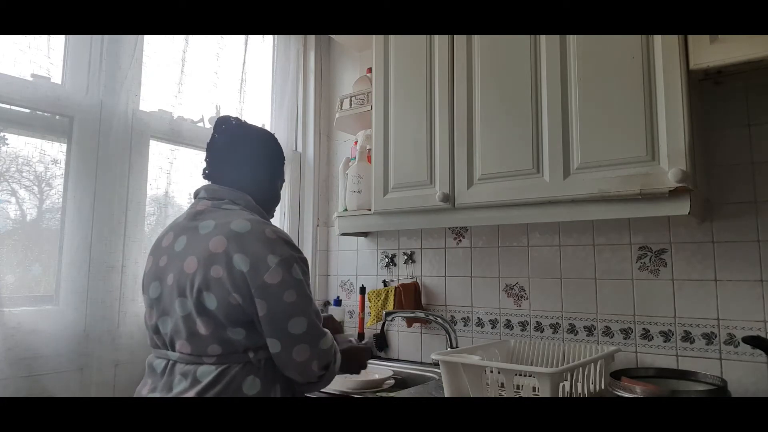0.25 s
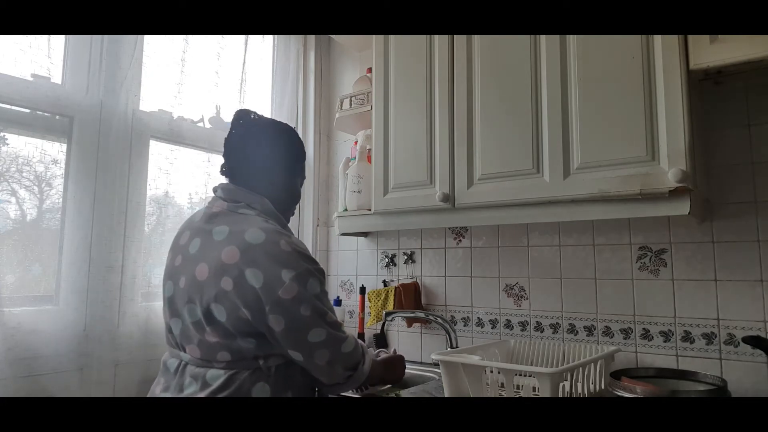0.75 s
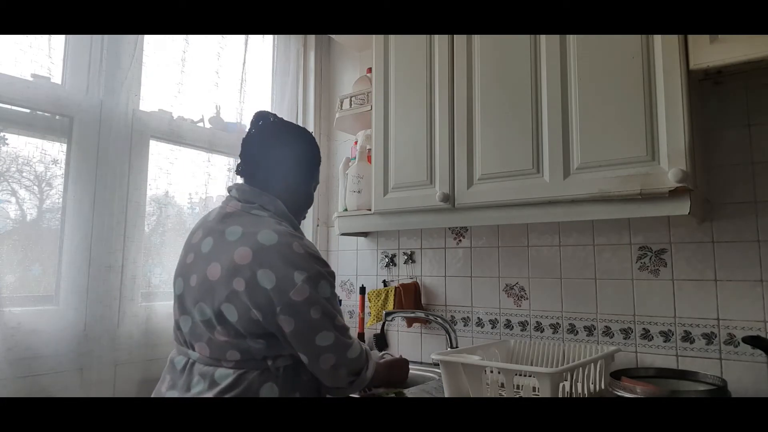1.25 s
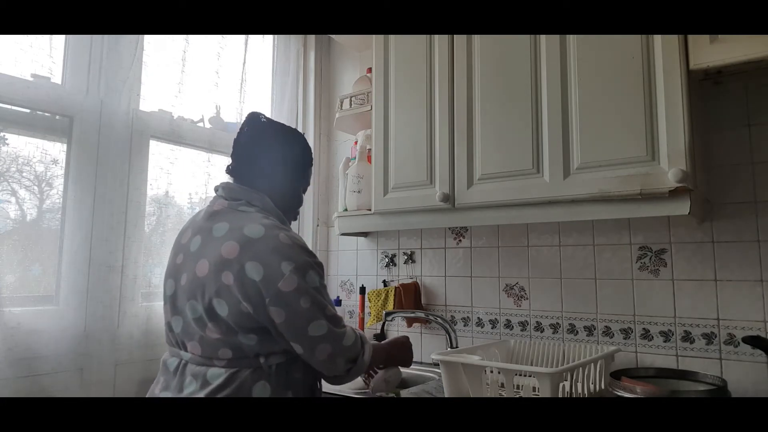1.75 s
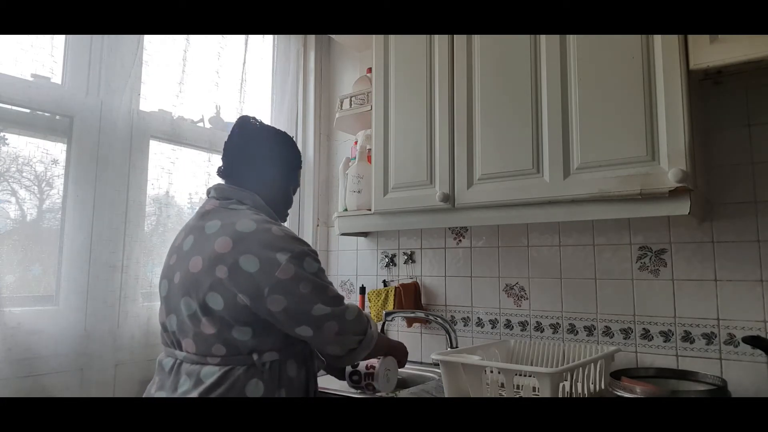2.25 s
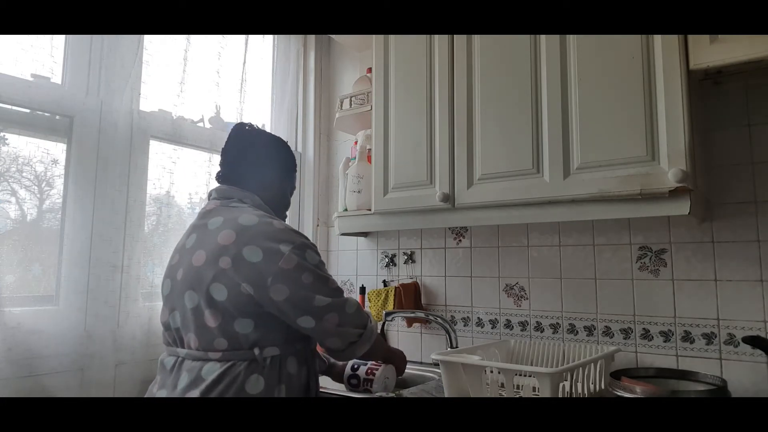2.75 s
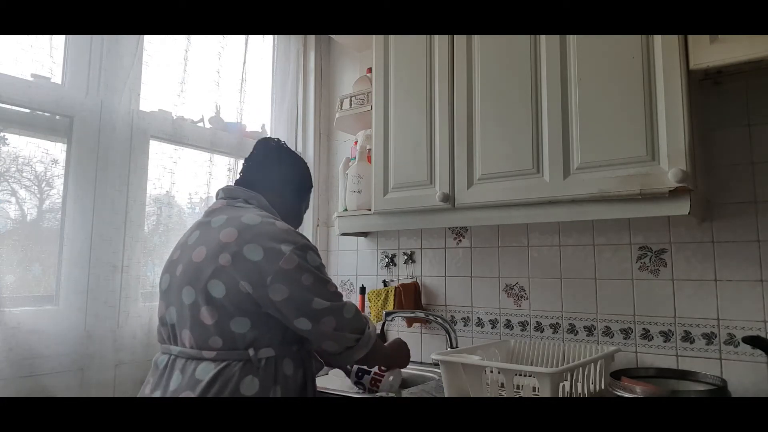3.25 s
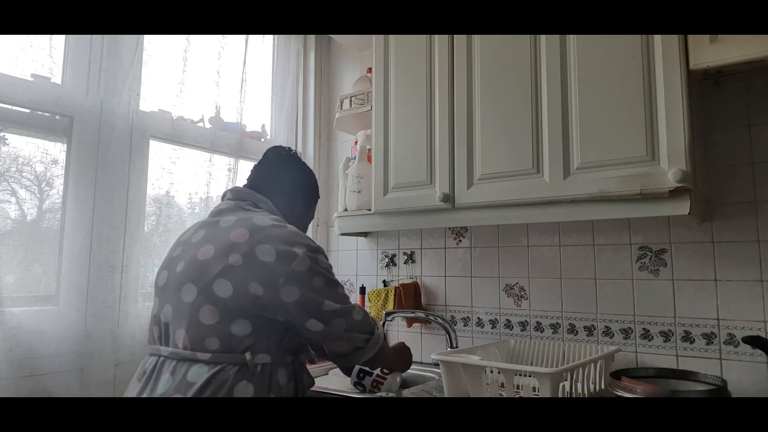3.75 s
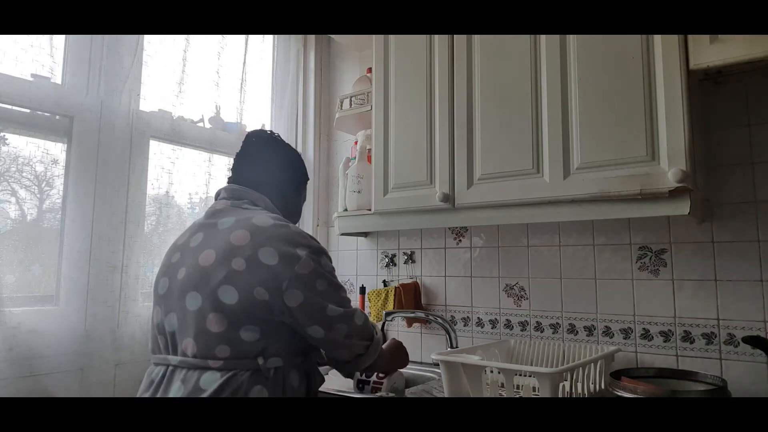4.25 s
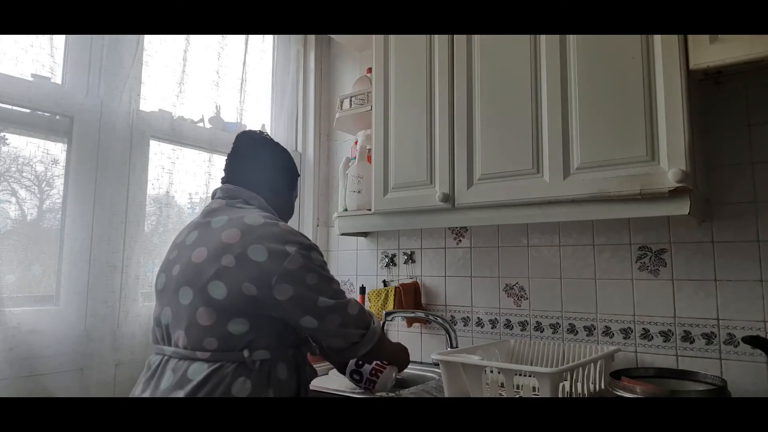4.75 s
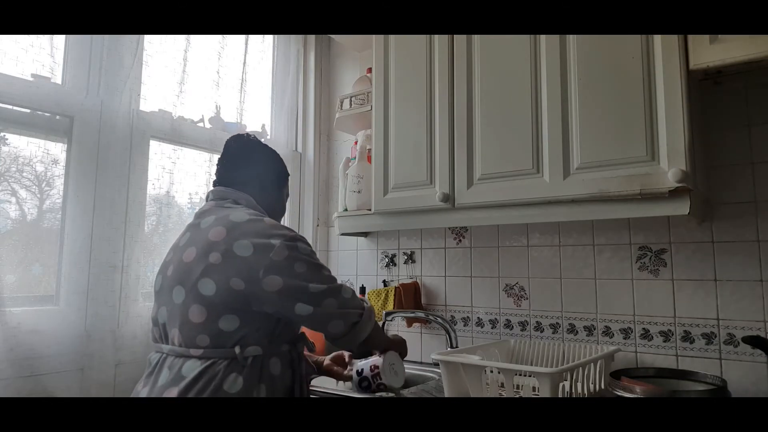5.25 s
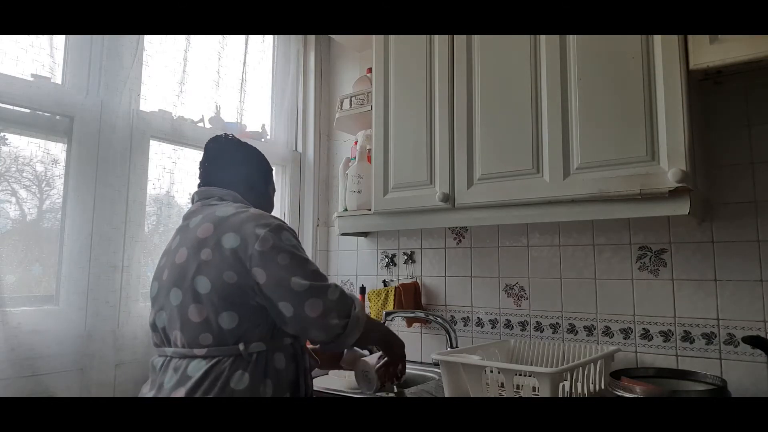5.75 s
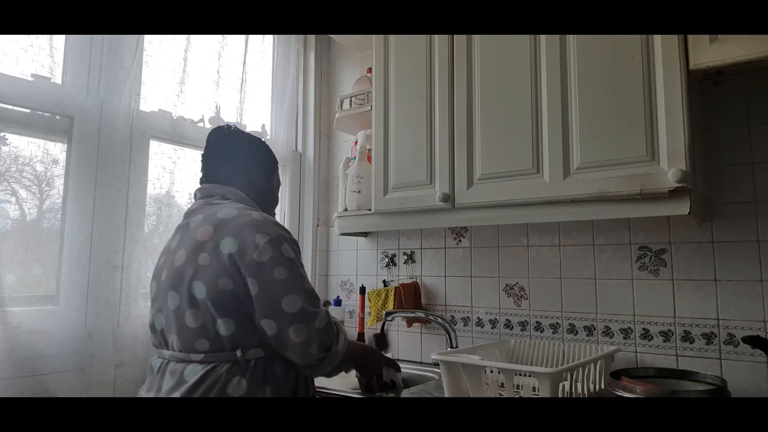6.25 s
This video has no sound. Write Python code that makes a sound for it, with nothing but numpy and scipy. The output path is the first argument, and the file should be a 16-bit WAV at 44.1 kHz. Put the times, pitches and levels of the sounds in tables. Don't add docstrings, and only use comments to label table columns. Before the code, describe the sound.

Hand dishwashing in a small tiled kitchen, heard in stereo from a few steps away. A bright mug clink breaks the quiet, followed by scraping, a pan wobbling to rest, and dull basin knocks and drags. A calmer stretch holds only little drips and slops and a faint pipe hum. Then more knocks, a firm set-down, and a harder slam with a brief plate ring, fading to quiet room tone.

```python
import sys
import numpy as np
from scipy import signal
from scipy.fft import rfft, irfft
from scipy.io import wavfile
from scipy.ndimage import uniform_filter1d

SR = 44100
rng = np.random.default_rng(int(sys.argv[2]) if len(sys.argv) > 2 else 0)


def attenuation_scalar(level_db):
    decades = np.asarray(level_db, float) / 20
    return 10 ** decades


def persist_wave(psi):
    counts = np.round(np.clip(psi, -1, 1) * 32767).astype(np.int16)
    wavfile.write(sys.argv[1], SR, np.atleast_2d(counts).T)


N = 286643

# (time [s], peak level [dB], thud [dB], clang [dB], crack [dB])
KNOCKS = [(0.9075, -41, 3.5, 11, 20.5), (0.913, -40, 5, 7.5, -9), (.935, -39.5, 4.5, 10.5, 16.5),
          (1.082, -53.5, 11.5, -30, 17.5), (1.157, -40.5, -43, -1, 11), (1.319, -46.5, -24, 8, 1),
          (1.431, -41.5, 6.5, 5.5, -13), (2.022, -30, -21, -14, -17), (2.031, -21.5, 2.5, 0, -7),
          (2.043, -23.5, -14, -3.5, -1.5), (2.253, -25, -6.5, -7.5, -10.5), (2.612, -38, 8.5, -2, 11),
          (2.748, -33, 0.5, -17, -9.5), (4.068, -34.5, 1, 4.5, 11.5), (4.145, -27.5, 3.5, -6, 3),
          (4.318, -66, 15, -3, 24.5), (5.192, -41, -13, -9, 3), (5.255, -35, -28, -1, -4)]
SET_DOWN = [
    (5.0605, -18, -12.5, -13.5, -4.5),
    (5.066, -17, -1, -6, -3.5),
    (5.074, -26, -6.5, -9.5, -6),
    (5.086, -25, -3, -12, -3),
    (5.125, -30.5, -10, -8, -7.5),
]
SLAM = [
    (5.5748, -15.5, -8, -7, -1.5),
    (5.5785, -19, 2.5, -5.5, 2),
    (5.584, -20, -4, -6.5, -6),
    (5.5995, -23, -1.5, -9.5, -2.5),
    (5.632, -33, -7, -9, -1.5),
]
# (time [s], rim peak [dB], base lag [s], base peak [dB])
ROCKS = [
    (1.525, -17.5, .018, -24),
    (1.648, -22, .02, -25.5),
    (1.764, -25, 0.023, -27),
    (1.857, -27, 0.023, -27.5),
    (1.935, -27, .024, -27),
    (2.0, -30.5, 0.0085, -32.5),
]
ROCK_THUD_DB, ROCK_CLANG_DB = -1.5, 2
RIM_CRACK_DB, BASE_CRACK_DB = -3, -10.5

# (frequency [Hz], level [dB], t60 [s])
BASIN_LOW = [(69, -2.5, 0.11), (107, -10, 0.3), (142.1, 9.5, 0.14), (203.4, -2, 0.25), (232.7, -2.5, 0.13),
             (307, -0.5, 0.11)]
BASIN = [(360.5, -2, 0.044), (400, 0.5, 0.053), (500, 2.5, 0.013), (481.5, 6, 0.12), (561, -0.5, 0.08),
         (576.7, 7, 0.064), (625, 6.5, 0.036)]
BASIN_HIGH = [(702, 2, 0.049), (737, 5, 0.087), (790, -22, 0.12), (844, -3.5, 0.14), (808, 10.5, 0.014),
              (980, 1, 0.036), (1260, 7, 0.0044)]
# (frequency [Hz], level [dB], t60 [s])
PAN_LOW = [(69.3, -4, 0.13), (137.3, 1, 0.14), (278.4, -2.5, 0.22)]
PAN = [(484, -9, 0.084), (583, -3, 0.14), (1018, -23, 0.69), (1130, -20.5, 0.084)]
PAN_HIGH = [(693, -17, 0.044), (733.3, -10.5, 0.27), (735, -9.5, 0.066), (1376, -28, 0.34),
            (1496, -29.5, .2), (1639, -24.5, 0.31)]
# (frequency [Hz], level [dB], t60 [s])
SET_LOW = [(66, -2, .1), (128.6, 9.5, 0.052), (199.7, 1.5, 0.1), (235, 1, 0.072), (298, 10, 0.08)]
SET_MID = [(367, -1.5, 0.034), (385, 0, .05), (486, 5, 0.068), (528.5, 1.5, 0.046), (566, 5, .07),
           (582, 6.5, 0.045), (643, 2, 0.065), (667, 1, 0.079)]
SET_HIGH = [(730, 2, .06), (900, -0.5, 0.024), (1114, -6, 0.034), (1770, -4.5, .02), (1980, -6.5, .03)]
# (frequency [Hz], level [dB], t60 [s])
SLAM_LOW = [(69, 1.5, .1), (124, 6.5, .08), (149, 5.5, .08), (193, 5.5, 0.066), (236, -0.5, .08),
            (267, -4, 0.066), (309.4, -0.5, 0.14)]
SLAM_MID = [(394, 1, .07), (464.6, 3, 0.089), (510, 0, .03), (558, 1.5, .05), (626, 6, .05), (638, 4, .06),
            (668, 6.5, 0.05)]
SLAM_HIGH = [(721, 7.5, 0.062), (880, 1.5, .04), (990, 4.5, .04), (1195, -9, .04), (1567, -7, 0.036),
             (1950, -10, .04), (2035, -13, 0.043)]
# (frequency [Hz], level [dB per Hz])
CRACK = [(530, -9.5), (900, -14), (1010, -19), (1700, -15.5), (2000, -13), (2250, -17), (3650, -15),
         (7000, -36.5), (9100, -39), (15400, -120)]
SIZZLE = [(3500, -33.5), (5500, 0.5), (7000, -9), (10000, -12), (12500, -19), (14500, -25.5),
          (16000, -77.5)]
SIZZLE_DB, SIZZLE_GROWTH = -20, 0.17
VARY_DB, VARY_S = 2.5, .04

# (start [s], rise [s], hold [s], level [dB], weight as thud [dB])
DRAG = [(0.95, 0.011, 0.12, -54, -18), (1.153, 0.0069, 0.0096, -57, -25), (1.217, 0.027, 0.1, -41, -21),
        (1.297, 0.026, 0.063, -43, -1), (2.061, 0.013, 0.07, -27, 1), (2.19, 0.064, 0.033, -49, -16),
        (2.238, 0.0088, 0.067, -34, -7), (2.333, 0.015, 0.034, -62, 21.5), (2.47, 0.1, 0.13, -33.5, 3),
        (2.708, 0.034, 0.081, -28, 1.5), (2.918, 0.028, 0.028, -42.5, -3), (3.01, 0.011, 0.16, -57, -4),
        (3.204, 0.049, 0.23, -61.5, -9), (3.49, 0.033, 0.075, -54, -15.5), (3.755, 0.025, 0.42, -58, -20),
        (4.169, 0.04, 0.051, -34, 6), (4.296, 0.021, 0.3, -67.5, 12.5), (4.57, 0.1, 0.3, -63, 1),
        (4.89, 0.056, 0.2, -57, -13), (5.115, 0.069, 0.061, -26.5, -3.5),
        (5.342, 0.011, 0.047, -59.5, 10.5)]
DRAG_CLANG_DB, DRAG_RELEASE_S = -10.5, 0.031

# (time [s], peak level [dB], brightness [dB])
CLINKS = [(0.912, -23.5, -9), (.9172, -18.5, -11.5), (.9275, -18.5, 4.5), (0.936, -25.5, -7.5),
          (0.947, -29, 9.5), (0.957, -29, 14.5), (0.967, -27.5, 4.5), (.985, -36, 4), (1.0082, -39.5, 16),
          (1.1603, -49.5, -1), (1.3462, -31.5, 7), (1.371, -39, 3.5), (2.6115, -36.5, 1.5),
          (4.0698, -30.5, -13.5)]
# (start [s], rise [s], hold [s], level [dB])
SCRAPE = [
    (1.2, 0.045, 0.085, -58.5),
    (1.335, 0.015, 0.12, -44),
    (1.36, 0.023, 0.025, -57),
    (1.4, 0.019, 0.0064, -49.5),
    (1.455, .015, .03, -46),
]
SCRAPE_RELEASE_S, SCRAPE_CLANG_DB = 0.0059, 6.5
# (time [s], peak level [dB])
PLATE_HIT = [
    (5.5748, -30),
]
# (frequency [Hz], level [dB], t60 [s])
MUG = [(1973, 2.5, 0.08), (2070, -17, .03), (2930, -9.5, .03), (3490, -20.5, .03), (3900, -20.5, .02)]
MUG_HIGH = [(4730, -21, .03), (5080, -15, .05), (5850, -21.5, .03), (6410, -15, .035), (8730, -27, 0.025),
            (9000, -21, .03), (9950, -25, .04), (11060, -19.5, .05), (12000, -26.5, .03), (12900, -27, .03),
            (13950, -22.5, .04)]
SQUEAL = [(740, -4.5, 0.034), (1980, -9, .05), (2080, -6.5, .07), (3480, -16, .05), (4770, -22, .05),
          (5100, -9.5, .12), (5750, -18, .04), (6520, -13, 0.061), (9070, -19.5, .03), (9900, -16.5, .04),
          (11220, -19.5, .03), (12060, -23, .04), (12500, -20, .04), (14000, -18.5, .03)]
PLATE = [(1394, -4, .42), (3450, 13, .012), (4200, 3, .01), (5906, 6, .05)]
# (frequency [Hz], level [dB per Hz])
RIM = [(530, -14), (900, -26.5), (1580, -22), (2040, 0.5), (2640, -15), (4460, -16.5), (5190, -16),
       (6700, -17.5), (7650, -42.5), (8700, -20), (14700, -38)]

# (start [s], rise [s], hold [s], level [dB], relative spray [dB])
SLOP = [(2.127, 0.01, 0.15, -52.5, -6), (2.345, 0.015, 0.091, -55, -0.5), (2.463, 0.023, 0.16, -44, -16),
        (2.607, 0.016, 0.061, -54, -10.5), (2.747, 0.03, 0.1, -56.5, -6.5), (2.935, 0.009, 0.1, -56, -10),
        (3.094, 0.018, 0.13, -70, -9), (3.225, 0.044, 0.11, -60.5, -7), (3.426, 0.022, 0.29, -63.5, -35),
        (3.75, 0.018, 0.68, -67, -22), (4.262, 0.021, 0.072, -64, -3.5), (4.408, 0.044, 0.02, -60, -10.5),
        (4.514, 0.046, 0.35, -68.5, -12.5), (4.84, 0.13, 0.19, -71.5, -8), (5.2, 0.015, 0.015, -53, -13.5),
        (5.344, 0.025, 0.1, -65, -12), (5.859, 0.057, 0.014, -59, -12.5)]
SLOP_RELEASE_S = 0.11
# (time [s], peak level [dB])
SLAPS = [(2.236, -45), (2.2853, -43), (2.4, -37), (2.441, -44), (2.497, -39), (2.535, -58), (2.562, -48),
         (2.609, -39), (2.825, -57), (2.948, -44), (3.237, -56), (3.288, -59.5), (3.498, -49.5),
         (3.567, -57), (3.7574, -53), (4.314, -51), (4.455, -53), (4.59, -54), (4.8476, -52.5),
         (5.247, -36.5), (5.961, -48)]
# (time [s], peak level [dB], pitch [Hz], pitch rise [share])
DROPS = [(2.281, -33, 4440, 0.085), (2.385, -40, 4680, 0.074), (2.401, -45.5, 2300, 0.065),
         (2.491, -43, 1910, 0.049), (2.818, -34, 1920, 0.37), (2.97, -51.5, 2140, 0.083),
         (3.06, -49, 1463, 0.27), (3.09, -54.5, 1800, 0.12), (3.125, -51, 5410, 0.039),
         (3.289, -44.5, 3900, 0.047), (3.299, -52, 2624, 0.041), (3.22, -68, 510, 0.026),
         (3.31, -37.5, 790, 0.03), (3.337, -46.5, 1870, 0.17), (3.42, -47, 2136, 0.15),
         (3.499, -43.5, 1300, 0.91), (3.568, -51, 4300, 0.056), (3.756, -43.5, 3065, 0.14),
         (3.757, -47, 644, 0.032), (3.9, -50.5, 566, 0.041), (4.0, -52, 533, .03), (4.322, -47, 1350, 0.76),
         (4.46, -48, 4380, 0.073), (4.58, -53, 1930, 0.057), (4.615, -50.5, 485, 0.074),
         (5.359, -51.5, 1644, 0.35), (6.055, -61.5, 2020, 0.092)]
DROP_ATTACK_S = 0.00049
DROP_T60_S, DROP_T60_SLOPE = 0.09, -0.6
# (frequency [Hz], level [dB per Hz])
WATER = [(710, -50.5), (1200, -18.5), (1520, -18.5), (2320, -6.5), (2660, -12), (2830, -8.5), (3560, -5.5),
         (7500, -21.5), (9750, -25), (16500, -120)]
SPRAY = [(4000, -29), (6500, -2.5), (8000, -9.5), (11000, -11.5), (14300, -11), (16000, -78)]

# (frequency [Hz], t60 [s])
KITCHEN = [(60, 0.084), (150, 0.11), (500, 0.25), (1500, 0.28), (4000, 0.27), (12000, 0.3)]
# (frequency [Hz], likeness [0-1])
LIKENESS = [(60, 0.92), (150, 1), (300, 0.68), (600, 0.91), (1200, 0), (4000, 0.14), (12000, 0.094)]
# (frequency [Hz], left minus right [dB])
LEAN = [(60, -2), (150, 2.5), (350, -3.5), (700, 3), (1400, 1.5), (3000, 9.5), (6000, 10.5), (9000, -5),
        (14000, -19.5)]
EARLY_DB, EARLY_S = 8.0, .018
BUILD_S, LOW_CUT_HZ = .0012, 55

# (start [s], rise [s], hold [s], level [dB])
PIPE_HUMS = [
    (3.24, 0.041, 0.28, -55.5),
    (3.84, 0.041, 0.063, -49),
]
PIPE_HZ = 103.5
# (time [s], level [dB])
SWELL = [
    (0, -55),
    (.8, -57),
    (1.7, -42.5),
    (3.0, -58),
    (4.2, -52),
    (5.001, -56.5),
    (5.75, -50),
    (6.1, -59),
    (6.5, -57.5),
]
# (frequency [Hz], level [dB per Hz])
HUM = [(15, -52), (25, -34.5), (48, -8), (102, -2.5), (124, -17), (159, -2), (179, -25), (214, -7),
       (257, -23.5), (309, -23.5), (569, -30), (705, -25.5), (1300, -30), (1690, -82), (2860, -120)]
AIR = [(760, -43), (1300, -3.5), (1570, -24.5), (1780, -15), (2090, -15), (2630, -11), (3540, -4),
       (4460, -16), (6490, -12), (11000, -31.5), (14300, -70.5), (22000, -120)]
AIR_DB = -67


def blows(events, low_modes, modes, high_modes):
    s, peak_db, thud_db, clang_db, crack_db = np.transpose(events)
    sizzle_db = SIZZLE_DB + SIZZLE_GROWTH * (peak_db + 5)
    thud = struck(contact(s + 0.0042, peak_db + thud_db - 10.5, lasts_s=0.022, first_db=10), low_modes)
    body = struck(contact(s + 0.001876, peak_db - 5.0, lasts_s=0.0021, first_db=5.5), modes)
    clang = struck(contact(s, peak_db + clang_db - 3.0, lasts_s=0.004, first_db=6.0), high_modes)
    crack = colour(contact(s, peak_db + crack_db + 25, lasts_s=0.005, first_db=-15), CRACK)
    sizzle = colour(contact(s, peak_db + sizzle_db + 28.5, lasts_s=0.0026, first_db=-7.0), SIZZLE)
    return thud + body + clang + (crack + sizzle)[0]


def rocking_pan():
    rim = [(s, db, ROCK_THUD_DB, ROCK_CLANG_DB, RIM_CRACK_DB) for s, db, lag, base_db in ROCKS]
    base = [(s + lag, base_db, ROCK_THUD_DB, ROCK_CLANG_DB, BASE_CRACK_DB) for s, db, lag, base_db in ROCKS]
    return blows(rim + base, PAN_LOW, PAN, PAN_HIGH)


def contact(times, level_db, lasts_s, first_db):
    clicks = np.zeros(N)
    clicks[np.round(np.asarray(times) * SR).astype(int)] = attenuation_scalar(level_db)
    r = np.exp(-1 / (lasts_s * SR))
    unit = np.sqrt((1 - r * r) ** 3 / (1 + r * r))
    swell = signal.lfilter([0, unit], [1, -2 * r, r * r], clicks + 1e-18)
    return attenuation_scalar(first_db) * clicks + swell * grit(20000, spread_db=1.0)


def struck(force, modes):
    step = round(VARY_S * SR)
    out = 0
    for k, (hz, db, t60) in enumerate(modes):
        shares = attenuation_scalar(VARY_DB * rng.standard_normal(N // step + 1))
        share = np.repeat(shares, step)[:N]
        out = out + attenuation_scalar(db) * ring(force * share, hz, t60) * (-1) ** k
    return out


def ring(clicks, hz, t60):
    r = attenuation_scalar(-60 / (max(t60, .005) * SR))
    w = 2 * np.pi * hz / SR
    return signal.lfilter([0, np.sin(w)], [1, -2 * r * np.cos(w), r * r], clicks + 1e-18)


def drag():
    force = strokes(DRAG, DRAG_RELEASE_S)
    heavy = strokes(DRAG, DRAG_RELEASE_S, np.transpose(DRAG)[4])
    hard = attenuation_scalar(DRAG_CLANG_DB) * force + attenuation_scalar(SCRAPE_CLANG_DB) * strokes(SCRAPE, SCRAPE_RELEASE_S)
    low = rubbed(attenuation_scalar(-4.5) * heavy * grit(500, spread_db=2.5), BASIN_LOW, damping=0.63)
    high = rubbed(attenuation_scalar(-9) * hard * grit(530, spread_db=4.5), BASIN_HIGH, damping=0.46)
    middle = rubbed(attenuation_scalar(-8.5) * force * grit(600, spread_db=5.5), BASIN, damping=0.93)
    return low + middle + high


def strokes(rows, release_s, extra_db=0):
    start, rise, hold, db = np.transpose(rows)[:4, :, None]
    t = np.arange(0, N + 32, 32) / SR - start - rise
    swelling, fading = t / np.maximum(rise, .002), (hold - t) / release_s
    shape_db = 20 * np.minimum(0, np.minimum(swelling, fading))
    gain = attenuation_scalar(db + np.reshape(extra_db, (-1, 1)) + np.maximum(shape_db, -200)).sum(axis=0)
    return np.interp(np.arange(N) / 32, np.arange(len(gain)), gain)


def grit(per_s, spread_db):
    sizes = attenuation_scalar(spread_db * np.minimum(rng.exponential(1, N), 4)) * rng.choice([-1, 1], N)
    return rms_one(sizes * (rng.random(N) < per_s / SR))


def rubbed(force, modes, damping):
    sound = sum(attenuation_scalar(db) * ring(force, hz, t60 * damping) for hz, db, t60 in modes)
    energy = sum(attenuation_scalar(2 * db) * t60 * damping * SR / (4 * np.log(1000)) for hz, db, t60 in modes)
    return sound / np.sqrt(energy)


def mug():
    s, peak_db, bright_db = np.transpose(CLINKS)
    blow = contact(s, peak_db, lasts_s=0.0017, first_db=-6.0)
    bright = contact(s, peak_db + bright_db, lasts_s=0.00046, first_db=-2.0)
    clinks = struck(blow, MUG) + struck(bright, MUG_HIGH)
    plate_s, plate_db = np.transpose(PLATE_HIT)
    plate = struck(contact(plate_s, plate_db - 8, lasts_s=0.0022, first_db=10), PLATE)
    force = attenuation_scalar(4.5) * strokes(SCRAPE, SCRAPE_RELEASE_S) * grit(1500, spread_db=1.5)
    squeal = rubbed(attenuation_scalar(-1.0) * force, SQUEAL, damping=1.0)
    rough = colour(attenuation_scalar(11.0) * bright + attenuation_scalar(-5.5) * force, RIM)[0]
    return clinks + plate + squeal + rough


def water():
    slop = strokes(SLOP, SLOP_RELEASE_S) * grit(500, spread_db=4.5)
    spray = strokes(SLOP, SLOP_RELEASE_S, np.transpose(SLOP)[4]) * grit(1500, spread_db=6.5)
    slap_s, slap_db = np.transpose(SLAPS)
    slaps = contact(slap_s, slap_db + 22, lasts_s=0.0037, first_db=-7.0)
    out = colour(slop + slaps, WATER)[0] + colour(spray, SPRAY)[0]
    dealt = rng.integers(0, 160, N)
    for k, hz in enumerate(np.geomspace(1200, 6000, 16)):
        out += attenuation_scalar(-12) * ring(slop * (dealt == k), hz, 18 / hz)
    for s, db, hz, rise in DROPS:
        sound = drop(db, hz, rise)
        start = round(s * SR)
        room_left = len(out[start:start + len(sound)])
        out[start:start + room_left] += sound[:room_left]
    return out


def drop(db, hz, rise):
    t = np.arange(SR // 5) / SR
    t60 = DROP_T60_S * (hz / 1000) ** DROP_T60_SLOPE
    span = 4 * SR / hz
    ragged = 1 + 1.5 * uniform_filter1d(rng.standard_normal(len(t)), size=int(span)) * np.sqrt(span)
    tone = attenuation_scalar(db - 60 * t / t60) * np.sin(2 * np.pi * hz * (t + rise * t ** 2 / t60))
    return tone * ragged / 1.1 * (1 - np.exp(-t / DROP_ATTACK_S))


def kitchen(direct_db):
    t = np.arange(SR * 3 // 4) / SR

    def dying(hz):
        t60 = at_hz(KITCHEN, hz)
        return attenuation_scalar(-60 * t / t60) / np.sqrt(t60)

    echoes = stereo_bands(len(t), dying) * (1 - np.exp(-t / BUILD_S)) * attenuation_scalar(EARLY_DB * np.exp(-t / EARLY_S))
    echoes /= np.sqrt(np.sum(echoes ** 2) / 2)
    echoes[:, 0] = attenuation_scalar(direct_db)
    spectrum = rfft(echoes, 65536)
    power = np.mean(np.abs(spectrum) ** 2, axis=0) / 5 + np.abs(spectrum.mean(axis=0)) ** 2
    levelling = minimum_phase(-np.log(uniform_filter1d(power, size=28)) / 2)
    return irfft(spectrum * levelling)[:, :len(t)]


def stereo_bands(size, gain):
    out = 0
    edges = 25 * 2 ** np.arange(0, 9.6, .5)
    white = rng.standard_normal((2, 2, size))
    left_right = np.array([[1], [-1]])
    for k, (low, high) in enumerate(zip(edges, edges[1:])):
        band = signal.butter(2, [low, high], "band", fs=SR, output="sos")
        mid, side = signal.sosfilt(band, white[k % 2])
        hz = np.sqrt(low * high)
        alike = np.clip(at_hz(LIKENESS, hz), 0, 1)
        pair = np.sqrt(1 + alike) * mid + np.sqrt(1 - alike) * side * left_right
        out = out + gain(hz) * pair * attenuation_scalar(at_hz(LEAN, hz) / 2 * left_right)
    return out


def colour(x, spectrum):
    hz = np.maximum(np.fft.rfftfreq(8192, 1 / SR), 1)
    taps = irfft(minimum_phase(np.log(attenuation_scalar(at_hz(spectrum, hz)))))
    return signal.fftconvolve(np.atleast_2d(x), [taps / np.linalg.norm(taps)])[:, :N]


def minimum_phase(log_gain):
    cepstrum = irfft(log_gain)
    half = len(cepstrum) // 2
    cepstrum[1:half] *= 2
    cepstrum[half + 1:] = 0
    return np.exp(rfft(cepstrum))


def at_hz(points, hz):
    table_hz, values = np.transpose(points)
    return np.interp(np.log(hz), np.log(table_hz), values)


def rms_one(x):
    return x / np.sqrt(np.mean(x ** 2) + 1e-20)


def pipe():
    waver = np.cumsum(rng.standard_normal(N)) * .01
    return strokes(PIPE_HUMS, .05) * np.sin(2 * np.pi * PIPE_HZ * np.arange(N) / SR + waver)


def hum():
    noise = stereo_bands(N, lambda hz: 1)
    swell_db = np.interp(np.arange(N) / SR, *np.transpose(SWELL))
    rumble = attenuation_scalar(swell_db - 1.5) * rms_one(colour(noise, HUM))
    return rumble + attenuation_scalar(AIR_DB) * rms_one(colour(noise, AIR))


def scene():
    crockery = blows(KNOCKS, BASIN_LOW, BASIN, BASIN_HIGH) + rocking_pan() + drag()
    set_down = blows(SET_DOWN, SET_LOW, SET_MID, SET_HIGH) + blows(SLAM, SLAM_LOW, SLAM_MID, SLAM_HIGH)
    paths = [(crockery, kitchen(direct_db=-15.5)), (set_down, kitchen(direct_db=-12.0)),
             (mug(), kitchen(direct_db=-11.5)), (water(), kitchen(direct_db=-11.0))]
    sink = sum(signal.fftconvolve([sound], echoes)[:, :N] for sound, echoes in paths)
    no_bass = signal.butter(3, LOW_CUT_HZ, "high", fs=SR, output="sos")
    return signal.sosfilt(no_bass, sink) + pipe() + hum()


def top_cut(x):
    return signal.sosfilt(signal.butter(12, 14600, fs=SR, output="sos"), x)


def record(dry):
    return top_cut(dry)


dry = scene()
out = record(dry)
persist_wave(out)
```